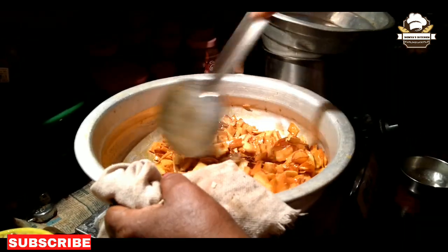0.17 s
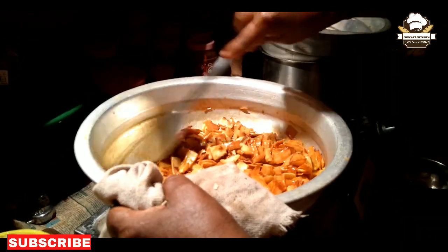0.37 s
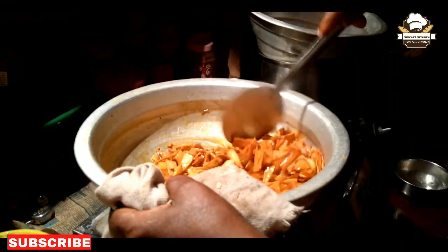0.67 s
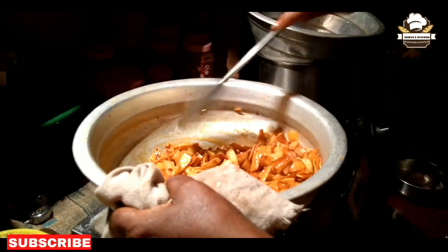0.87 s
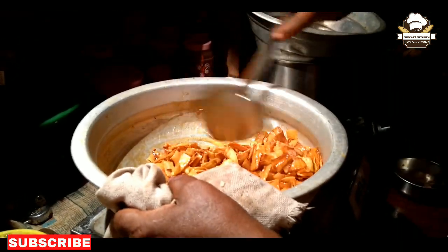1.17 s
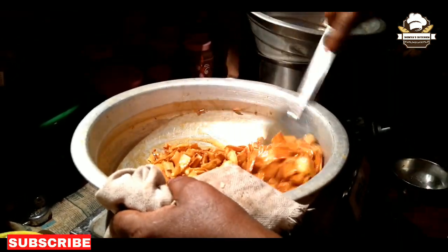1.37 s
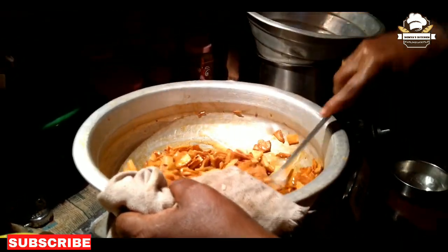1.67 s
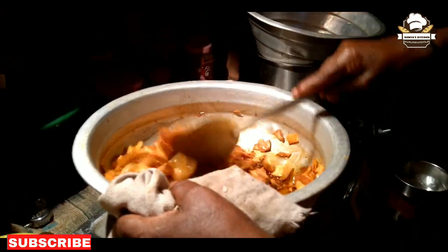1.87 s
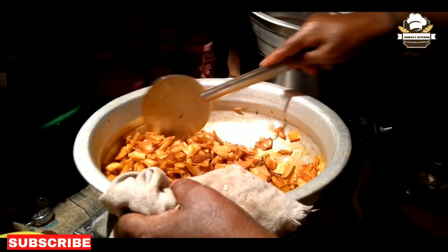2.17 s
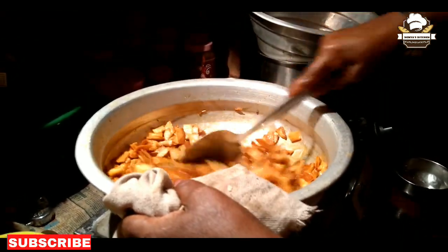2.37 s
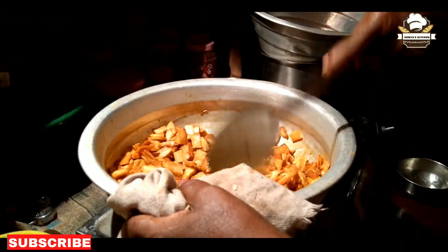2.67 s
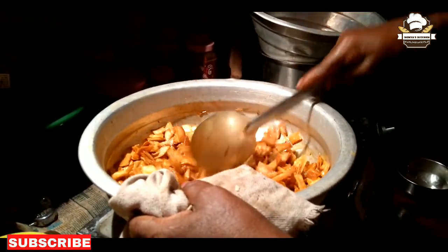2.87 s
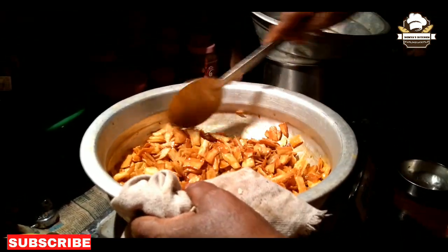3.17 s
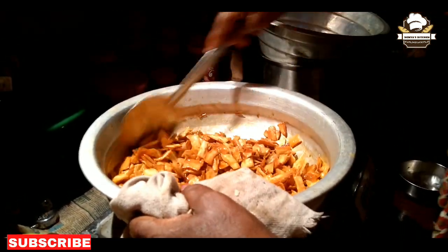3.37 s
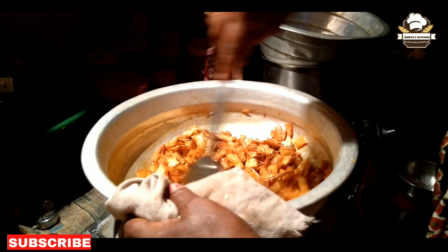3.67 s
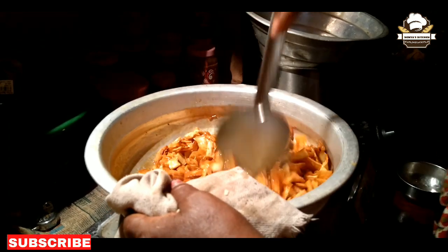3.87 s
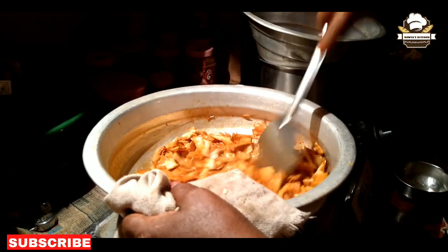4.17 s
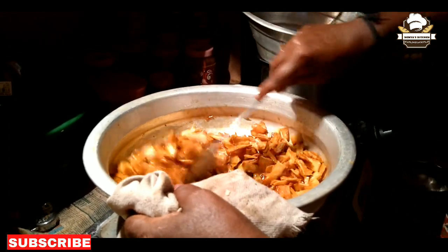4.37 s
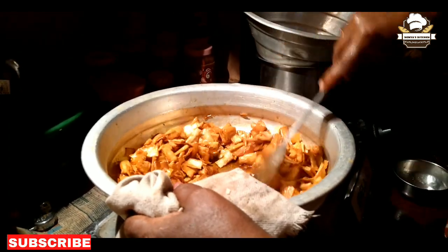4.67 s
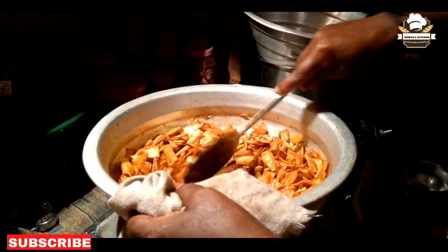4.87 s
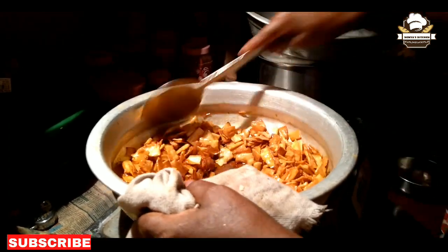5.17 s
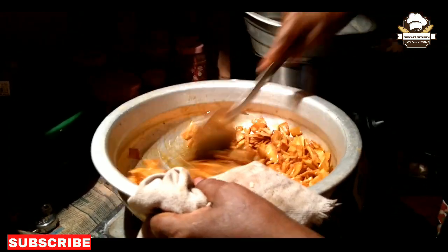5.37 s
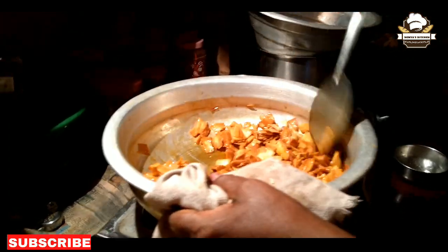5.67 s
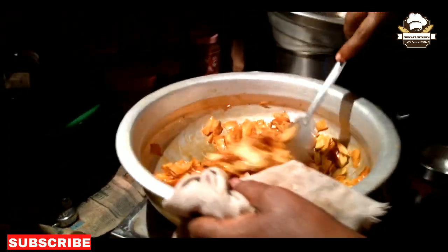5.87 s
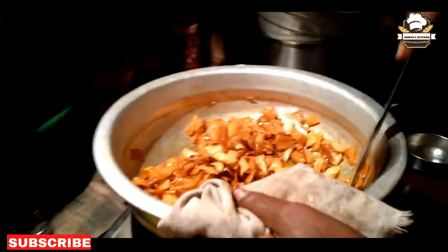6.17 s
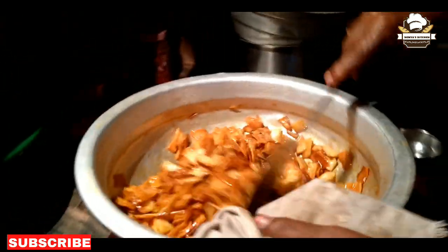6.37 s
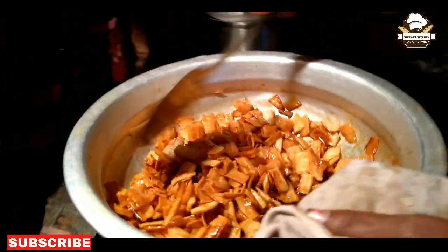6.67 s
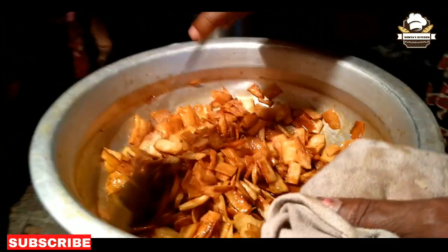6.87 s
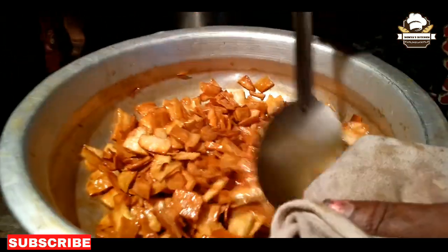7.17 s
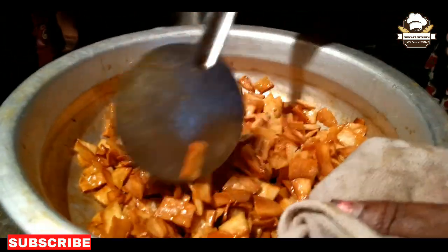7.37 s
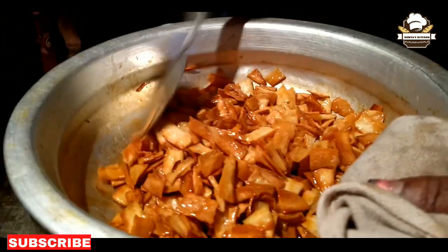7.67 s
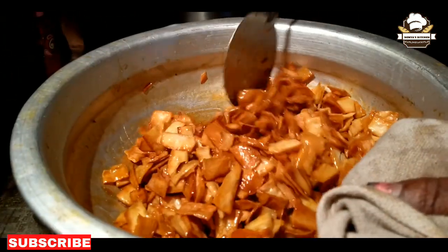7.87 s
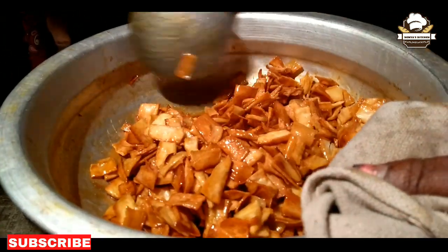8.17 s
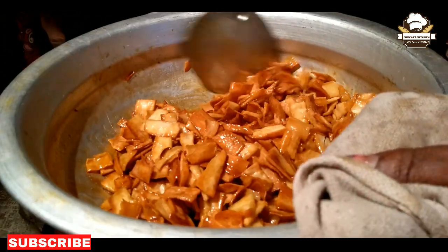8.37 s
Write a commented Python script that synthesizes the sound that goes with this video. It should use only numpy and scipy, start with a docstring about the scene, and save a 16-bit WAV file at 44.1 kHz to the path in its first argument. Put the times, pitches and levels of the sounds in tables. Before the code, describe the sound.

Close stereo capture of vigorous stirring: a ladle blade rasps over bare metal, pushes through a dull cushion of food, clanks the rim and thumps the loaded bottom. Strokes come unevenly, with short near-quiet gaps. The pot rocks with low rumbles on its stand. After six seconds, a heavy scrape and clang starts a louder, closer run. Low room tone and faint engine hum stay far behind.

```python
"""A ladle blade grates over a faint far engine hum; clinks and dull knocks follow as it turns sticky food in a pot.
Grating and judder: uneven stick-slip pushes drive changing rings of ladle and pot; the coating adds tiny snaps.
Blows: single rings, damped by contact. Squawk: a few locked harmonics. Bowl: narrow gliding tones.
The pot's rocking, puffs of air and the room tone are filtered noise; the engine is a few shaft orders.
The treble balance between the ports drifts as the microphone moves."""
import sys
import numpy as np
from scipy import signal
from scipy.fft import rfft, irfft, next_fast_len
from scipy.io import wavfile
from scipy.ndimage import uniform_filter1d, map_coordinates

SR = 44100
rng = np.random.default_rng(int(sys.argv[2]) if len(sys.argv) > 2 else 0)


def wav_out(sig):
    """Save sig, one row per channel (or a flat mono array), as 16-bit PCM at SR to the path in sys.argv[1]."""
    wavfile.write(sys.argv[1], SR, np.round(np.clip(np.atleast_2d(sig).T, -1, 1) * 32767).astype(np.int16))


N = 374850

# ladle pushes; bare metal is bright, a cushion of food dull: [t/s, rise/s, hold/s, change over hold/dB,
# blade grating level/dB, pot judder level/dB, blade brightness/dB, pot brightness/dB]
PUSHES = [(0, 0.0013, 0.15, -5.5, -46.5, -68, -2, 4), (0.341, 0.016, 0.029, 3.5, -66, -60, -2, 7),
          (0.54, 0.04, 0.082, 5.5, -38.5, -40, 0.5, 4), (0.838, .05, .16, -3, -65.5, -61, -5.5, 12),
          (1.061, 0.006, 0.11, 16, -63, -79, -5, -6), (1.24, 0.052, 0.03, -1, -34, -30.5, -2, -0.5),
          (1.421, 0.081, 0.02, 6.5, -41, -45.5, 2, 22), (1.555, .03, 0.29, -9, -42, -55, -1, 1),
          (1.762, 0.053, 0.017, -5.5, -64, -44.5, 2, 3), (1.977, .02, 0.42, 5.5, -62.5, -69.5, 1, 3.5),
          (2.43, .03, 0.082, -14.5, -30, -26.5, -6.5, -1), (2.71, .01, 0.085, -5.5, -66, -59.5, 0, 6),
          (2.82, 0.0089, 0.12, -2, -48.5, -49, -1.5, -.5),
          (3.11, 0.076, 0.029, -3.5, -54.5, -65, -3.5, -0.5), (3.291, .03, .015, -4.5, -59, -50, -1, 5),
          (3.371, 0.024, 0.13, 5.5, -36, -41, -.5, 0.5), (3.526, 0.051, 0.14, -16, -27.5, -25, -0.5, 0.5),
          (3.693, 0.05, 0.24, -4, -46.5, -59, 2, -9), (3.921, 0.028, 0.026, -13, -52.5, -38, -19, 10.5),
          (4.236, 0.1, 0.12, 3.5, -44.5, -43, -3, 5), (4.496, 0.048, 0.25, -5, -47.5, -46.5, -1.5, 5.5),
          (4.613, 0.036, 0.011, -13, -35, -33, -6.5, 31), (4.912, 0.081, 0.11, -27.5, -41.5, -29, -1, 3),
          (5.141, 0.011, 0.011, -9.5, -58.5, -61, -19, 7), (5.32, 0.077, 0.16, -25, -35, -26.5, -5.5, -2),
          (5.726, 0.011, 0.021, -3, -71, -51, -1.5, -0.5), (5.789, 0.015, 0.21, -5.5, -38, -41.5, -3, 0.5),
          (5.95, 0.035, 0.075, -9, -54, -36, -14, 4), (6.271, 0.027, 0.07, 2.5, -43, -48, 4.5, 1.5),
          (6.372, 0.0044, 0.16, -27.5, -23.5, -16.5, -1.5, 0.5),
          (6.905, 0.016, 0.14, -12, -40, -21, 12.5, 1), (6.979, 0.041, 0.007, -12, -19.5, -32.5, 2, 3),
          (7.029, 0.051, 0.11, -6, -36, -26.5, 4, 3), (7.254, 0.045, 0.18, -21, -57.5, -58, -9.5, 18),
          (7.41, .02, 0.037, 3, -73.5, -67, -3.5, 3), (7.67, 0.013, 0.17, 1.5, -39, -29, 1.5, 2.5),
          (7.87, 0.04, 0.018, -16, -28.5, -27, -8, 38), (8.401, 0.059, 0.096, -14, -24, -37, -1.5, 0)]
# blade strikes metal: [t/s, level before common gain/dB, brightness/dB, favoured f/Hz]
CLINKS = [(0.5132, -16, -1, 1700), (1.074, -37.5, 13, 9700), (1.1615, -16.5, 0, 4100),
          (1.2238, -12, -0.5, 3270), (1.4802, -17.5, -8.5, 4400), (1.536, -19.5, -6, 3930),
          (1.879, -39, 12, 3400), (1.9666, -26.5, -2.5, 4050), (1.9856, -24, 2, 4370),
          (2.0827, -33.5, 3, 6600), (2.158, -23, 3, 4260), (2.2145, -25, 9.5, 6700), (2.284, -36, 2, 6930),
          (2.302, -34.5, 4, 7730), (2.4571, -6.5, -2.5, 2400), (3.166, -37.5, -5, 3230),
          (3.3203, -31.5, 5, 6100), (3.365, -37.5, 0, 2200), (3.3793, -15, 4.5, 3070),
          (3.3874, -11.5, -2, 3130), (4.0334, -29.5, 2.5, 12900), (4.0998, -33, 3.5, 7700),
          (4.2423, -31.5, 5, 5770), (4.296, -32.5, 7, 3710), (4.4245, -26.5, 10, 3750),
          (4.542, -22, -4.5, 1630), (4.6584, -15.5, -7, 3100), (4.8313, -23.5, -1.5, 1480),
          (4.916, -29.5, -4, 3600), (4.9492, -18, -7, 1690), (5.3101, -11.5, 2.5, 3780),
          (5.3312, -17.5, 9, 3900), (5.604, -43.5, -5.5, 4000), (5.7927, -19.5, 0.5, 3820),
          (6.245, -40, -2, 1700), (6.2684, -22.5, 5, 3760), (6.2958, -20.5, -2.5, 5760),
          (6.3749, -15.5, -4, 4000), (6.8586, -7, -1, 5230), (6.989, -17, 14, 3800), (7.0034, -11, 7, 6740),
          (7.3178, -37, 2.5, 3530), (7.6442, -14, -2.5, 7650), (7.6777, -18, 7, 1500),
          (7.8765, -13, 4.5, 4200), (7.8911, -13.5, -0.5, 4010), (8.075, -32.5, 0, 4620),
          (8.3869, -17, -6.5, 3830), (8.4198, -10.5, 3, 3900), (8.4405, -6.5, 2, 3930)]
# ladle bumps the loaded bottom: [t/s, level before common gain/dB, brightness/dB, favoured f/Hz]
KNOCKS = [(0.512, -11, 1.5, 620), (0.711, -29.5, 3, 665), (1.162, -25.5, -1, 740), (1.219, -6, 1.5, 715),
          (1.479, -20.5, 9.5, 920), (2.456, -5, 0.5, 955), (2.839, -50, 8.5, 950),
          (3.382, -19.5, -0.5, 710), (3.544, -17, 0, 424), (3.943, -23, -2, 383), (4.541, -18, -2.5, 535),
          (4.832, -16.5, 0.5, 662), (4.928, -17.5, 0.5, 900), (4.954, -7, 4.5, 580), (5.33, -14.5, 6, 653),
          (5.396, -12.5, -3.5, 209.5), (5.408, -8.5, 9, 695), (6.373, -1.5, 0.5, 574), (6.397, -5, 2, 558),
          (6.859, -18.5, 1, 1400), (6.902, -5, -2.5, 565), (6.91, -7.5, -2.5, 542), (7.063, -7, 5.5, 719),
          (7.149, -24, 6.5, 582), (7.679, -4, 0.5, 700), (7.835, -9.5, 3.5, 597), (7.842, -19.5, 8, 646),
          (7.854, -14.5, 6, 653), (7.864, -12, -0.5, 700), (8.077, -41, 6, 900), (8.423, -18.5, 5.5, 694),
          (8.455, -15.5, -2.5, 600)]
# single modes of the ladle: [f/Hz, relative level/dB]
LADLE_MODES = [(1120, -9.5), (2950, -7.5), (3500, 7), (3635, -1), (3940, 0.5), (4110, -2.5), (4580, -10),
               (5240, 5), (5770, -1), (6230, -10), (6590, -5), (6900, -14.5), (7260, -11), (7600, -11.5),
               (8100, -6), (8800, -7), (9340, -3), (10640, -19.5), (11650, -16.5), (12200, -10.5),
               (14600, -10.5), (15050, -12)]
# single modes of the food-damped pot: [f/Hz, relative level/dB]
POT_MODES = [(197, -19.5), (358, -1.5), (435, -9.5), (491, -5), (581, 6), (655, -3), (718, 6.5),
             (940, -3.5), (1068, -6), (1243, -1), (1335, -6.5), (1696, -23.5)]
# crowd of weaker ladle modes: [f/Hz, relative spectral level/dB]
LADLE_CROWD = [(200, -34.5), (700, -7.5), (1300, -3), (2200, 0.5), (4000, 3), (5200, 0), (7500, -2),
               (10500, -7.5), (13000, -10), (15300, -6)]
# crowd of weaker pot modes: [f/Hz, relative spectral level/dB]
POT_CROWD = [(50, -46), (130, -25), (190, -9.5), (270, -8.5), (380, 0.5), (600, -1), (800, -0.5),
             (1100, -3.5), (1350, -6.5), (1700, -14.5), (2600, -25), (6000, -55), (15000, -74)]
# lift of the blade by harder contact: [f/Hz, gain per brightness/(dB/dB)]
BLADE_LIFT = [(1500, -1), (2900, 0.02), (4800, 1.1), (8000, 2.5), (13000, 2)]
# lift of the pot by harder contact: [f/Hz, gain per brightness/(dB/dB)]
POT_LIFT = [(190, -2.5), (400, 1.53), (700, 3), (1100, 3.5), (2000, 4)]
# treble balance as the microphone moves: [t/s, left minus right level/dB]
BEARING = [(0, -3.5), (.5, 0.5), (1.2, 1.5), (2.45, 6.5), (3.4, 5), (4.3, 9), (5.3, 8), (5.8, 6),
           (6.37, 18), (6.9, 7.5), (7.7, 20.5), (8.4, 17.5)]
# share of the bearing taken off the right port: [f/Hz, share/(dB/dB)]
SHADOW = [(300, 0.061), (800, 0.083), (2000, 0.47), (4000, 1.25), (8000, 1.7), (12500, 1.3), (15000, 0.48)]
# periodic catch and slip of the blade: [t/s, mean pitch f/Hz, level/dB]
SQUAWK = [(3.52, 351.7, -59.5), (3.556, 353.8, -24.5), (3.578, 354.3, -11.5), (3.606, 356.6, -16),
          (3.641, 357, -30.5), (3.72, 362.3, -46)]
# harmonics of the squawk: [multiple, mean relative level/dB]
SQUAWK_ORDERS = [(1, -1.5), (2, -5.5), (3, 1.5), (4, -30)]
# notes of the rubbed bowl, one table each: [t/s, f/Hz, level before trim/dB]
BOWL_NOTES = [
    [(.55, 549, -43), (.63, 671, -34), (.69, 863, -52), (.78, 900, -69)],
    [(2.83, 880, -48), (2.85, 898, -42), (2.91, 980, -60), (2.97, 900, -46.5), (3.04, 900, -65.5)],
    [(3.98, 908, -61), (4.045, 1000, -40.5), (4.08, 1030, -69)],
    [(7.13, 624, -17), (7.2, 643, -33.5), (7.27, 742, -58), (7.35, 930, -52), (7.41, 908, -65),
     (7.45, 895, -51.5), (7.58, 880, -85)],
    [(8.418, 686, -31), (8.44, 658, -28.5), (8.458, 613, -24.5), (8.5, 590, -32)],
]
# pot rocking on its stand: [t/s, hold/s, level/dB, change over hold/dB]
ROCKING = [(1.2, 0.021, -45.5, -4), (2.43, 0.055, -38, -5.5), (3.7, 0.036, -41.5, -2),
           (4.35, 0.092, -43, -3), (4.56, 0.24, -54.5, -3), (4.93, 0.1, -41, 1.5), (5.32, 0.2, -43.5, -0.5),
           (5.85, 0.042, -46, 5), (5.98, 0.046, -34.5, -3), (6.37, 0.16, -26.5, -11),
           (6.66, 0.096, -52, -4.5), (6.89, .28, -41, 0.5), (7.28, 0.25, -64.5, 1),
           (7.7, 0.063, -42.5, -11), (7.9, 0.43, -62.5, 4), (8.41, 0.074, -47.5, -2)]
# stand spectrum: [f/Hz, relative spectral level/dB]
STAND = [(25, -25.5), (50, -18.5), (68, 5), (88, -7), (112, 5), (145, -15), (195, -14.5), (300, -38.5),
         (800, -64.5)]
# puffs of air on the microphone: [t/s, hold/s, level/dB, change over hold/dB]
PUFFS = [(.3, 0.35, -55.5, -5), (.83, 0.29, -42, -3), (1.44, 0.64, -51, -9.5), (3.03, 0.22, -57.5, 0)]
# buffeting spectrum: [f/Hz, relative spectral level/dB]
BUFFET = [(15, -1), (35, -4), (80, -6), (150, -17), (250, -14.5), (400, -43), (1000, -70.5)]
# far engine: [t/s, sixth order f/Hz, sixth-order group level/dB, fifth-order group level before trim/dB]
ENGINE = [(0, 189, -60, -63), (.7, 189, -66.5, -60), (1, 190, -44.5, -58), (1.4, 187, -50, -56),
          (1.9, 183, -53.5, -61), (2.3, 182, -64.5, -57.5), (2.9, 181, -71, -61), (3.2, 180, -66, -76.5),
          (4.3, 185, -66.5, -77.5), (6, 186, -65, -71.5), (8.5, 186, -75, -66.5)]
# quiet of the kitchen: [f/Hz, relative spectral level/dB]
ROOM_TONE = [(25, -9), (70, 0.5), (130, -6.5), (240, -11.5), (400, -18), (950, -24), (2000, -28),
             (4000, -35), (8500, -42), (15000, -53)]

TOP_HZ = 15800
RELEASE_DB_PER_S = 196.5  # the hand lets up
SKID_RISE_S, SKID_S, SKID_LOSS_DB = 0.0045, 0.033, -10  # blade skids on after a blow, losing speed
CLINK_SKID_DB, KNOCK_SKID_DB = -16.5, -17.5  # re the blow's table level
FIRM_DB, LIGHT_SKID_LOSS_DB_PER_DB = -18.5, 0.49  # lighter taps bounce off: less skid per dB below firm
ROCK_RISE_S, ROCK_RELEASE_DB_PER_S = 0.013, 232.5
PUFF_RISE_S, PUFF_RELEASE_DB_PER_S = .06, 192


def amp(db):
    """Decibels to gain."""
    return 10 ** (np.asarray(db) / 20)


def unit(x):
    """Scale so that the mean of the channels has rms 1."""
    return x / np.sqrt(np.mean(np.atleast_2d(x).mean(0) ** 2) + 1e-20)


def along(points, hz):
    """Interpolate [f/Hz, value] points on a log frequency axis."""
    f, v = np.transpose(points)
    return np.interp(np.log(hz + 1), np.log(f + 1), v)


def curves(rows, t):
    """Each column after the time, read at the times t."""
    s, *cols = np.transpose(rows)
    return [np.interp(t, s, c) for c in cols]


def wobble(rate_hz, size):
    """Smooth random curve with rate_hz knots a second."""
    knots = rng.standard_normal(int(size * rate_hz / SR) + 4)
    return map_coordinates(knots, [np.arange(size) * rate_hz / SR])


def coloured(x, points):
    """Minimum-phase filter of shape [f/Hz, gain/dB], built by folding the cepstrum."""
    m = 2 * next_fast_len(x.shape[-1] // 2 + 2048)
    gain = amp(along(points, np.fft.rfftfreq(m, 1 / SR)))
    cepstrum = irfft(np.log(gain))
    cepstrum[1:m // 2] *= 2
    cepstrum[m // 2 + 1:] = 0
    response = np.exp(rfft(cepstrum))
    return irfft(rfft(x, m) * response)[..., :x.shape[-1]]


def noise_pair(side_db, size):
    """Left and right noise with a common part."""
    mid, side = rng.standard_normal((2, size))
    return mid + amp(side_db) * np.array([side, -side])


def add(out, x, s):
    """Mix x into out from time s."""
    part = out[:, max(round(s * SR), 0):][:, :x.shape[1]]
    part += x[:, :part.shape[1]]


def placed(x, s):
    """Filter the right port by the treble balance at time s."""
    bearing_db = curves(BEARING, s)[0]
    shade = [(hz, -share * bearing_db) for hz, share in SHADOW]
    return np.array([x[0], coloured(x[1], shade)])


def envelope(rise_s, hold_s, change_db, release_db_per_s):
    """Gain over one second: a rise, a hold that swells or fades, a release."""
    t = np.arange(SR) / SR
    held = np.clip((t - rise_s) / hold_s, 0, 1)
    released_s = np.maximum(t - rise_s - hold_s, 0)
    return np.minimum(t / rise_s, 1) * amp(change_db * held - release_db_per_s * released_s)


def swells(rows, rise_s, release_db_per_s):
    """Gain of a row of swells that share their rise and release."""
    out = np.zeros((1, N))
    for s, hold_s, db, change_db in rows:
        add(out, amp(db) * envelope(rise_s, hold_s, change_db, release_db_per_s)[None], s)
    return out


def scraping(t):
    """Fine grit sings in the blade while slower slips shake the pot and the coating crackles."""
    blade_pushes = [(*shape, db, bright) for *shape, db, _, bright, _ in PUSHES]
    pot_pushes = [(*shape, db, bright) for *shape, _, db, _, bright in PUSHES]
    blade_gain, blade_bright_db = pressure(blade_pushes, CLINKS, CLINK_SKID_DB)
    pot_gain, pot_bright_db = pressure(pot_pushes, KNOCKS, KNOCK_SKID_DB)
    catches = slips(rate_hz=400, scatter=.8, spread_db=6.5, hiss_db=-7, size=N)
    grit = rubbed(catches, ladle_ring, t, blade_bright_db, steady_s=0.09)
    shakes = slips(rate_hz=130, scatter=.45, spread_db=3, hiss_db=-12, size=N)
    judder = rubbed(shakes, pot_ring, t, pot_bright_db, steady_s=0.045)
    balance = amp(np.outer([0, -1], curves(BEARING, t)[0]))
    snaps = crackle(rate_hz=76, pitch_hz=4760, spread_db=3, size=N) * balance
    snap_gain = amp(10.5) * np.minimum(blade_gain, amp(-48.5))  # no growth with hard pressure
    return blade_gain * grit + pot_gain * judder + snap_gain * snaps


def pressure(pushes, hits, skid_db):
    """Gain and brightness of rubbing on one body: pushes and skids after blows add in power."""
    strokes = list(pushes)
    for s, db, bright_db, _ in hits:
        level_db = db + skid_db - LIGHT_SKID_LOSS_DB_PER_DB * max(FIRM_DB - db, 0)
        strokes.append((s, SKID_RISE_S, SKID_S, SKID_LOSS_DB, level_db, bright_db))
    out = np.zeros((2, N))
    for s, rise_s, hold_s, change_db, db, bright_db in strokes:
        power = (amp(db) * envelope(rise_s, hold_s, change_db, RELEASE_DB_PER_S)) ** 2
        add(out, np.outer([1, bright_db], power), s)
    return np.sqrt(out[0]), out[1] / (out[0] + 1e-20)  # brightness: power-weighted mean


def slips(rate_hz, scatter, spread_db, hiss_db, size):
    """Stick and slip: pushes at uneven intervals and of uneven sizes, over smooth rubbing."""
    draw = rng.standard_normal((4000, 2))
    at = (np.cumsum(np.exp(scatter * draw[:, 0])) * SR / rate_hz).astype(int)
    inside = at < size
    pushes = np.bincount(at[inside], amp(spread_db * draw[inside, 1]), size)
    return unit(pushes) + amp(hiss_db) * rng.standard_normal(size)


def rubbed(force, answer, t, bright_db, steady_s):
    """A travelling contact keeps changing the ring; the hand keeps the mean strength even."""
    hop = SR // 16
    window = np.sin(np.linspace(0, np.pi, 2 * hop))
    padded = np.pad(force, 2 * hop)
    x = np.zeros((2, len(padded)))
    for i in range(hop, len(force) + 2 * hop, hop):
        now = min(i - hop, len(t) - 1)
        piece = padded[i:i + 2 * hop] * window
        add(x, signal.fftconvolve(piece[None], answer(t[now], bright_db[now]), axes=1), i / SR)
    x = x[:, 2 * hop:-2 * hop]
    power = np.abs(uniform_filter1d(x.mean(0) ** 2, int(steady_s * SR)))
    return x / np.sqrt(power + 1e-12)


def crackle(rate_hz, pitch_hz, spread_db, size):
    """Sticky coating lets go in tiny snaps of a few cycles each."""
    draw = rng.standard_normal((int(rate_hz * size / SR) + 1, 2))
    at = rng.integers(0, size, len(draw))[:, None] + np.arange(SR // 200)
    snap_hz = np.minimum(pitch_hz * np.exp(0.3 * draw[:, :1]), TOP_HZ)
    cycles = snap_hz * (at - at[:, :1]) / SR
    level = amp(spread_db * np.tanh(draw[:, 1:]))
    snaps = level * np.sin(2 * np.pi * cycles) * np.exp(-cycles / 4)
    return np.bincount(at.ravel(), snaps.ravel(), size)[:size]


def ladle_ring(s, bright_db):
    """Bright steel, damped by the hand."""
    tilt = [(hz, share * bright_db) for hz, share in BLADE_LIFT]
    x = ring(LADLE_CROWD, LADLE_MODES, tilt, t60_s=0.054, mode_t60_s=0.19, mode_db=-12, direct_db=-17.5,
             room_db=-1.5, room_t60_s=0.29, side_db=0.5, ripple_db=3.5)
    return placed(x, s)


def pot_ring(s, bright_db):
    """The hollow, short note of the full pot."""
    tilt = [(hz, share * bright_db) for hz, share in POT_LIFT]
    x = ring(POT_CROWD, POT_MODES, tilt, t60_s=.055, mode_t60_s=0.24, mode_db=-10.5, direct_db=-7.5,
             room_db=-8.0, room_t60_s=0.25, side_db=-6.5, ripple_db=3.5)
    return placed(x, s)


def ring(crowd_shape, modes, tilt, t60_s, mode_t60_s, mode_db, direct_db, room_db, room_t60_s, side_db, ripple_db):
    """Answer to one contact: direct push, crowded and single modes that vary by spot, kitchen tail."""
    t = np.arange(SR // 4) / SR
    decay = amp(-60 * t / t60_s) + amp(room_db - 60 * t / room_t60_s)
    crowd = noise_pair(side_db, len(t)) * decay
    crowd[:, 0] -= amp(direct_db) * np.linalg.norm(crowd[0])  # direct push
    grid_hz = np.geomspace(50, 16000, 150)
    ripple = ripple_db * rng.standard_normal(len(grid_hz))
    shape_db = along(crowd_shape, grid_hz) + along(tilt, grid_hz) + ripple
    hz, db = np.transpose(modes)
    spot_db = rng.normal(0, 5.5, len(hz))
    sides = 1 + amp(side_db) * np.outer([1, -1], rng.standard_normal(len(hz)))
    strength = amp(db + along(tilt, hz) + spot_db) * sides
    spot_hz = hz * (1 + rng.normal(0, 0.0032, len(hz)))
    tones = strength @ np.sin(np.outer(2 * np.pi * spot_hz, t).astype('f4'))
    single = unit(tones * amp(-60 * t / mode_t60_s))
    return unit(coloured(crowd, np.c_[grid_hz, shape_db])) + amp(mode_db) * single


def blows(rows, answer, gain_db, focus_db, width, grip_s, remain_db):
    """Single contacts: the spot favours one range of modes; the blade stays in touch and damps the ring."""
    out = np.zeros((2, N))
    spread = np.exp(width)
    for s, db, bright_db, hz in rows:
        focus = [(hz / spread, 0), (hz, focus_db), (hz * spread, 0)]
        x = coloured(answer(s, bright_db), focus)
        x = x * (amp(remain_db) + np.exp(-np.arange(x.shape[1]) / SR / grip_s))
        onset_rms = np.std(x.mean(0)[:SR // 200])  # first 5 ms
        add(out, amp(db + gain_db) * x / onset_rms, s)
    return out


def squawk():
    """For a moment the slips lock on to a mode of the pot."""
    t = np.arange(SQUAWK[0][0], SQUAWK[-1][0], 1 / SR)
    hz, db = curves(SQUAWK, t)
    phase = 2 * np.pi * np.cumsum(hz * (1 + 0.027 * wobble(130, len(t)))) / SR
    tone = np.zeros(len(t))
    for k, (_, level_db) in enumerate(SQUAWK_ORDERS, 1):
        tone += amp(level_db + 6.0 * wobble(90, len(t))) * np.sin(k * phase)
    out = np.zeros((2, N))
    add(out, placed(amp(db) * unit(np.array([tone, tone])), t[0]), t[0])
    return out


def bowl():
    """Rubbing feeds one narrow, gliding mode of the ladle's bowl."""
    out = np.zeros((2, N))
    for note in BOWL_NOTES:
        t = np.arange(note[0][0], note[-1][0], 1 / SR)
        hz, db = curves(note, t)
        drive = wobble(132, len(t)) + 1j * wobble(124.8, len(t))
        tone = unit(np.real(drive * np.exp(2j * np.pi * np.cumsum(hz) / SR)))
        faded = amp(db - 1.5) * tone * signal.windows.tukey(len(t), .1)
        add(out, np.tile(faded, (2, 1)), t[0])
    return out


def rocking():
    """The pot rocks on its stand: low noise in swells."""
    gain = swells(ROCKING, ROCK_RISE_S, ROCK_RELEASE_DB_PER_S)
    return gain * unit(coloured(noise_pair(-14.5, N), STAND))


def puffs():
    """Moving air buffets the microphone: low noise in slower swells."""
    gain = swells(PUFFS, PUFF_RISE_S, PUFF_RELEASE_DB_PER_S)
    return gain * unit(coloured(noise_pair(-18, N), BUFFET))


def engine(t):
    """Far engine: four orders of one shaft, each unsteady in phase and level."""
    hz, sixth_db, fifth_db = curves(ENGINE, t)
    shaft = 2 * np.pi * np.cumsum(hz / 6) / SR

    def order(count):
        """One multiple of the shaft rate."""
        return np.sin(count * shaft + .3 * wobble(3.9, N)) * amp(0.72 * wobble(7.7, N))

    sixth_group = order(6) + amp(-11) * order(8)
    fifth_group = order(5) + amp(-3.0) * order(4)
    return amp(sixth_db) * sixth_group + amp(fifth_db - 0.5) * fifth_group


def room_tone():
    """The quiet of the kitchen: steady filtered noise."""
    return amp(-63.5) * unit(coloured(noise_pair(-7, N), ROOM_TONE))


def scene():
    """Sum of all sources at the two ports."""
    t = np.arange(N) / SR
    clinks = blows(CLINKS, ladle_ring, gain_db=-12.5, focus_db=12.5, width=0.46, grip_s=0.004, remain_db=-5)
    knocks = blows(KNOCKS, pot_ring, gain_db=-12.5, focus_db=17.5, width=0.1, grip_s=0.0049, remain_db=3.5)
    contacts = scraping(t) + clinks + knocks + squawk() + bowl()
    return contacts + rocking() + puffs() + engine(t) + room_tone()


def record(dry):
    """Clip at full scale, then band-limit with a 300 Hz slope ending at TOP_HZ."""
    m = next_fast_len(N + SR // 2)
    passed = np.clip((TOP_HZ - np.fft.rfftfreq(m, 1 / SR)) / 300, 0, 1)
    return irfft(rfft(np.clip(dry, -1, 1), m) * passed, m)[:, :N]


dry = scene()
out = record(dry)
wav_out(out)
```